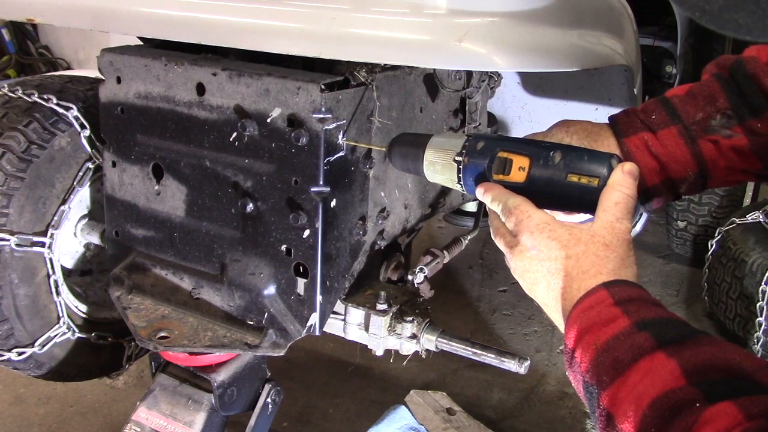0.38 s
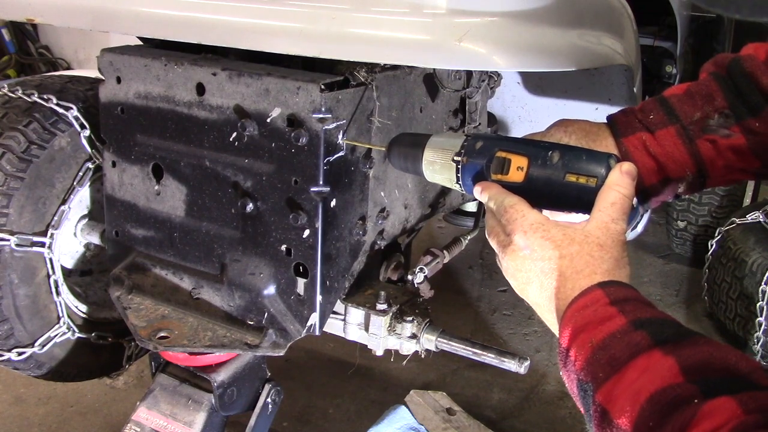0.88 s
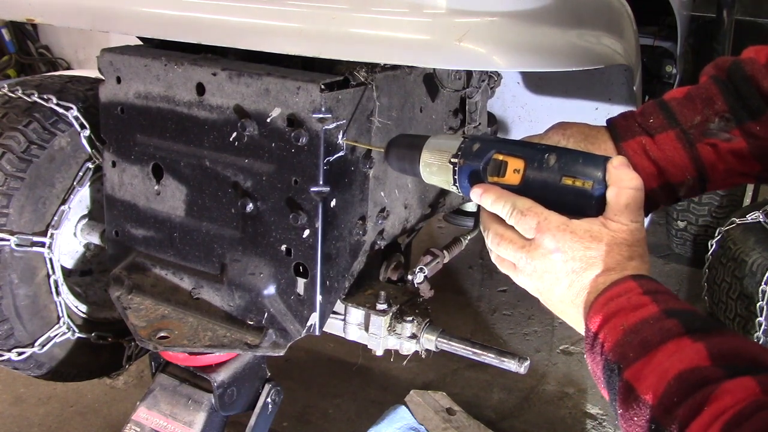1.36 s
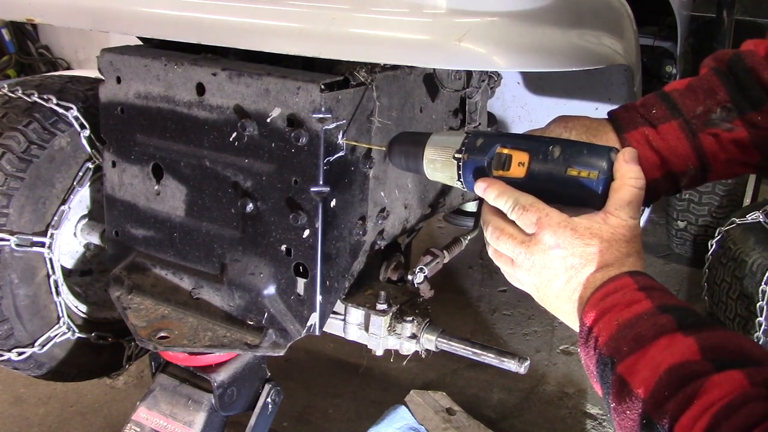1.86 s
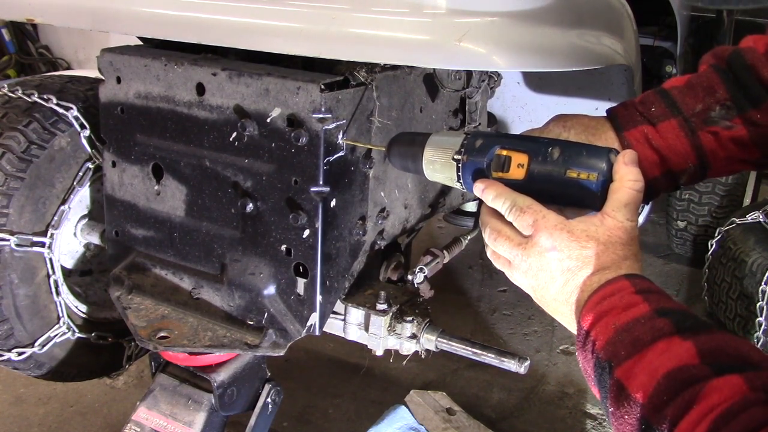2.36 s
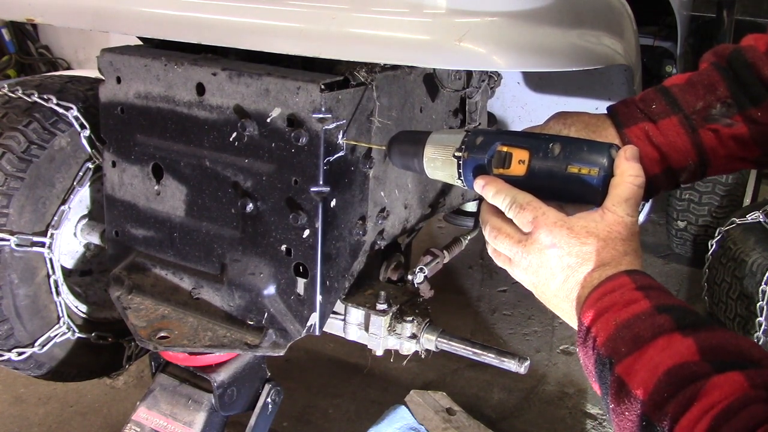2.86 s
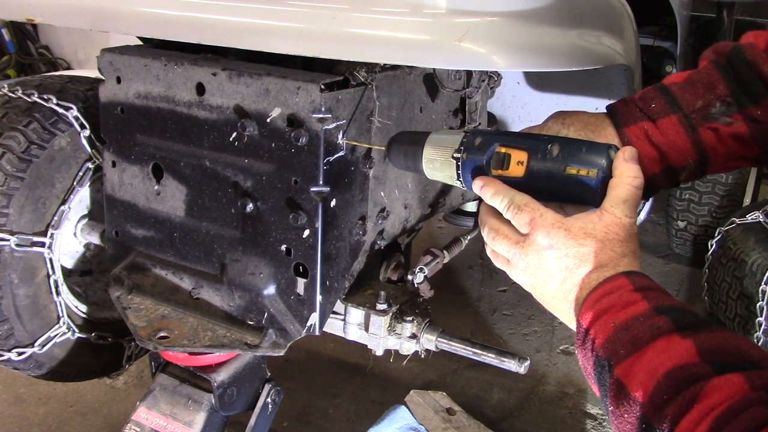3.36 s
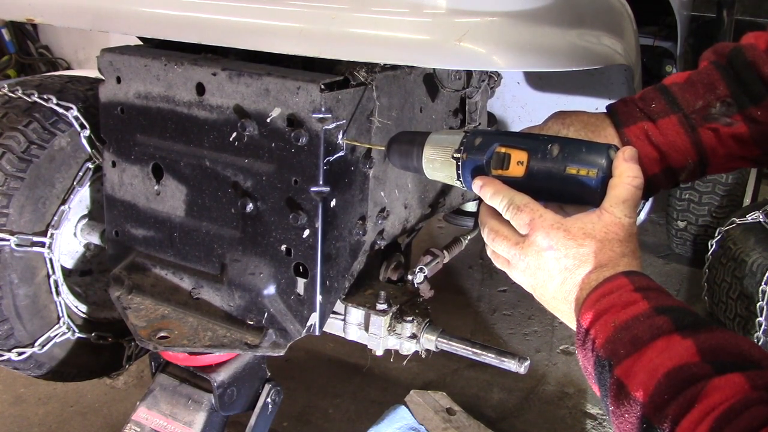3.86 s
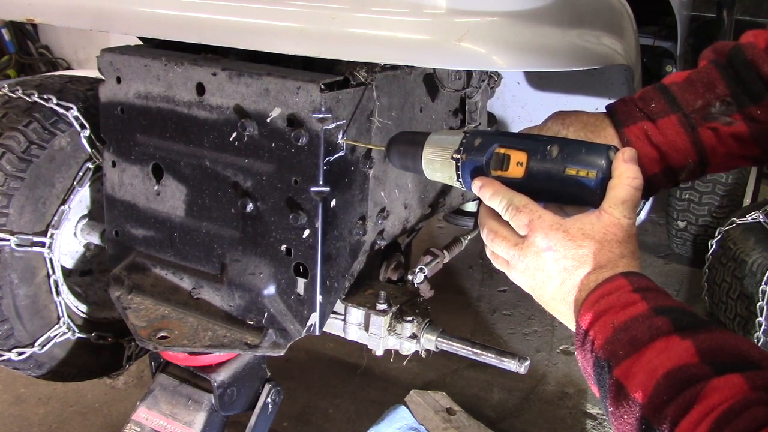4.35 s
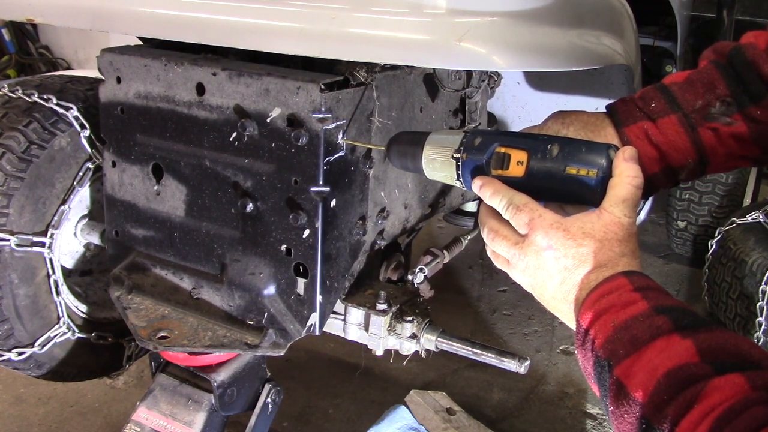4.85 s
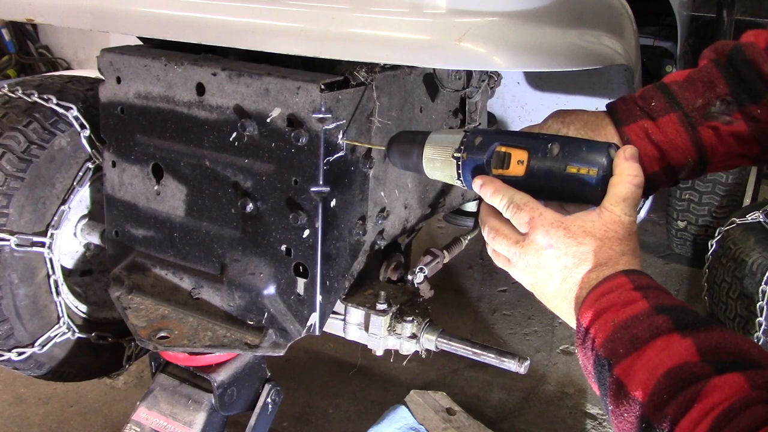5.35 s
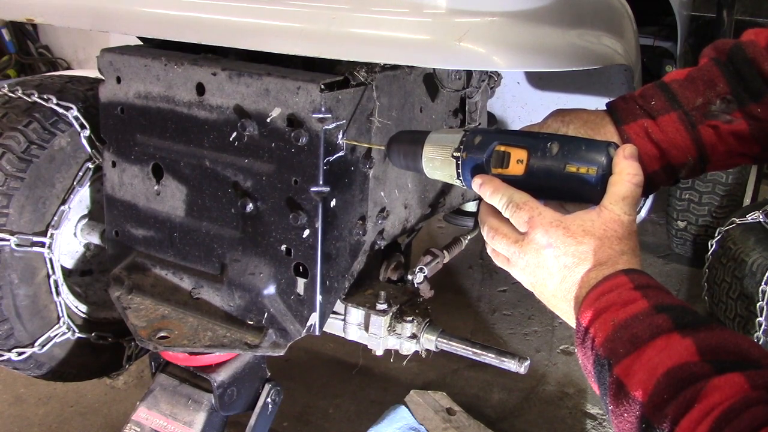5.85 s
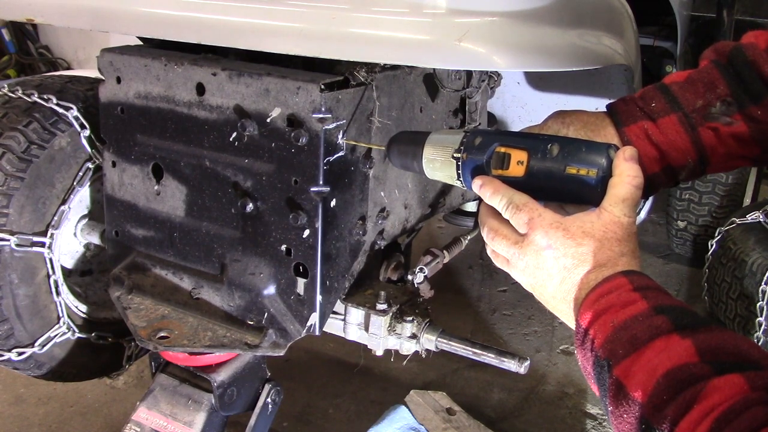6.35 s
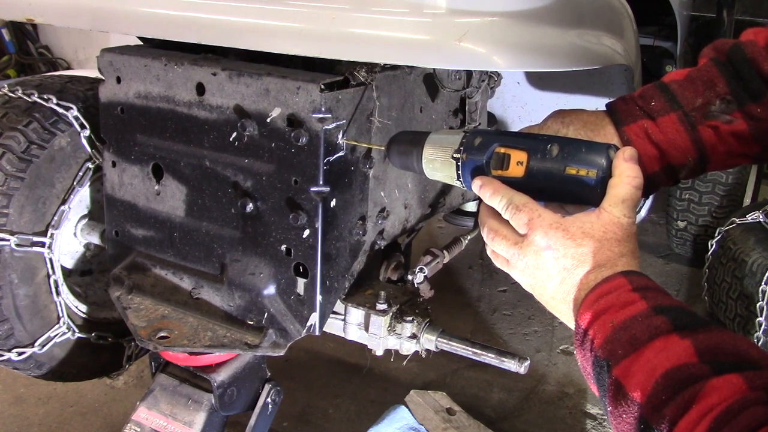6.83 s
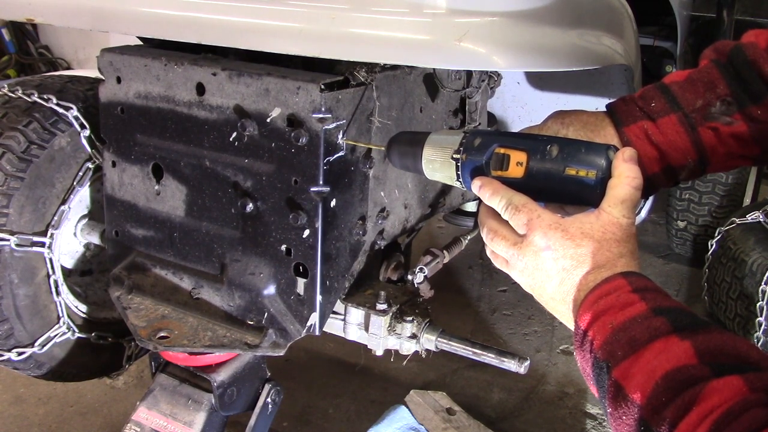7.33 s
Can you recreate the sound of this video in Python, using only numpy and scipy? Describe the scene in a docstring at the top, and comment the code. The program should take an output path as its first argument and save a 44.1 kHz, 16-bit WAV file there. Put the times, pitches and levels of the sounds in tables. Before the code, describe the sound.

A cordless drill is already running under load, close to the microphone in a garage. Its motor drones with a coarse plastic-housed gear buzz and bright hissing rattle, fluttering about fifteen times a second, while the bit scratches steadily at steel. At about 0.7 s the pressure lets up: the motor quickly races, a piercing whine around 4 kHz emerges, and the cutting falls away. From 1.3 s it sags back over roughly half a second to its steady, lower grind. A faint hum passes near 1.1 s. The cutting stays modest until about 3.3 s, then becomes louder, with crisp ringing and dry ticks around 4 to 5 kHz. Short squeaky chirps strike around 4.0 to 4.4 s, return from 6.0 s, and crowd together between 7.0 and 7.4 s. Soft low rumble swells underneath roughly every 1.2 s. The drill is still running at the end, about 7.5 s.

```python
"""A cordless drill bores a steel frame in a garage, close to a pair of microphone ports.
For about 0.6 s the pressure lets up: the motor races and whines, then sags back under load.
Motor and gears are tones and noise bands locked to shaft speed, coloured by the housing; rattle is noise.
Cutting is clicks that ring the frame, swelling once a chuck turn and louder later in the hole.
Hard catches chirp; a low rumble lies beneath, with one brief hum."""
import sys
import numpy as np
from scipy import signal
from scipy.fft import rfft, irfft
from scipy.io import wavfile
from scipy.ndimage import uniform_filter1d

SR = 44100
rng = np.random.default_rng(int(sys.argv[2]) if len(sys.argv) > 2 else 0)


def field_ratio(decibels):
    """Amplitude ratio for a level in dB (20 dB per decade); scalars and array-likes work."""
    return 10 ** (np.asarray(decibels, dtype=float) / 20)


def unload_wav(signal):
    """Save mono or channel-first audio to the path in sys.argv[1] as 16-bit WAV at rate SR, clipped to [-1, 1]."""
    wavfile.write(
        sys.argv[1],
        SR,
        np.round(np.clip(np.atleast_2d(signal).T, -1, 1) * 32767).astype(np.int16),
    )


N = 328986
T = np.arange(N) / SR
HZ = np.fft.rfftfreq(N, 1 / SR)

GEAR_RATIO = 15.85  # shaft turns per chuck turn
FREE_HZ, LOADED_HZ = 337.1, 237  # shaft turns per s
LET_UP_S, SPIN_UP_S, PRESS_S, SAG_S = .705, .072, 1.303, .289
WHINE_SETS_IN_S, WHINE_MUTED_DB = .75, -16
# off-centre gear, once a chuck turn
GEAR_HUM_MESHES_PER_TURN, HURRY_RAD, HURRY_AT_TURN, PRESS_DB = 42.9, .8, .74, 4.5
UNLOADED_BITE_DB = -15.5
SWELL_RISE_S, RUMBLE_FLOOR_DB = .046, -53.5
HUM_START_S, HUM_END_S, HUM_DB = 1.04, 1.225, -45
HUM_HZ, HUM_DROP_HZ, HUM_SETTLE_S = 158, 40.3, .025
SECOND_LIP_S, SECOND_LIP_DB = .034, -5.5

# Motor shaft speed while the bit is pressed in: [start_s, turns_per_s]
PRESSED_SPEED = [(0, 218.7), (.35, 232.6), (.7, 237.6), (2, 242.1), (3.5, 241.5), (4.4, 235.06),
                 (5.8, 234.8), (6.5, 232.4), (7, 234.5), (7.46, 232.7)]
# Armature whine against shaft speed, ahead of the housing: [turns_per_s, level_db]
ARMATURE_WHINE = [(246, -42), (253, -44), (259, -32.5), (296, -34.5), (306, -22.5), (322, -21), (337, -19)]
# Shaft orders, ahead of the housing: [shaft_multiple, free_db, loaded_db]
SHAFT_ORDERS = [(1, -50.5, -53.5), (2, -60.5, -58.5), (3, -53, -54.5), (4, -48, -59), (5, -58.5, -51.5),
                (8, -41, -62.5), (9, -45, -58.5), (10, -36.5, -59), (11, -46.5, -60), (15, -51, -59),
                (24, -59, -43)]
# Gear tones, ahead of throb and housing: [chuck_multiple, free_db, loaded_db]
CHUCK_TONES = [(30.8, -62, -58), (83.8, -58, -60), (85.8, -48, -49.5), (87.8, -55, -53), (89.8, -58, -59)]
# Rough gear meshes, ahead of throb and housing: [shaft_multiple, width_hz, free_db, loaded_db]
GEAR_MESHES = [(2.72, 58, -52, -53.5), (5.47, 120, -47.5, -50), (8.15, 40, -43, -56),
               (10.87, 75, -34.5, -41.5), (13.58, 53, -45.5, -38.5)]
# Plastic shell resonances: [centre_hz, width_hz, gain_db]
SHELL_MODES = [(286.6, 7.8, 8.5), (373, 18, 6), (464, 13.6, 9), (503, 21, 6.5), (567, 44, 9),
               (652, 48, 8.5), (710, 47, 3.5), (792, 79, 6), (1005, 11, 6.5), (1185, 16, 6),
               (1325, 103, 10.5), (1480, 125, 9.5), (1777, 39, 2.5), (1830, 11, 4), (3110, 160, 1.5),
               (3940, 110, 1.5), (6450, 560, 5)]
# Bit runout over time: [start_s, throb_factor]
BIT_RUNOUT = [(0, .8), (1.5, 1.0), (2, 1.45), (3.7, 1.35), (4.2, .75), (7.46, .85)]
# Relative rattle spectrum, ahead of the housing: [centre_hz, density_db_per_hz]
RATTLE_SPECTRUM = [(60, -31.5), (180, -24.5), (400, -21), (900, -17), (1100, -17.5), (1700, -11),
                   (2150, -18), (3000, -10), (4500, -1), (6500, -11), (8000, -11.5), (10000, -20.5),
                   (12500, -32.5), (16000, -43.5)]
# Gear and fan rattle over time: [start_s, level_db]
RATTLE_LEVELS = [(0, -21.5), (.65, -20.5), (.78, -17.5), (1.0, -20), (1.4, -23), (2, -21.5), (2.8, -21),
                 (5, -20), (7.46, -20.5)]
# Steel frame modes, relative energy: [pitch_hz, level_db, t60_s]
STEEL_MODES = [(2318, -9, .12), (2472, -7, .08), (2894, -7, .11), (3070, -13, .05), (3420, -13, .08),
               (3650, -12, .06), (3846, -9, .05), (4340, -4, .03), (4438, 0, .1), (4545, 1, .04),
               (4625, -2, .05), (4863, -2, .11), (4945, -6, .06), (5060, -6, .03), (5150, -6, .04),
               (5275, -11, .06), (5419, -1, .11), (5525, -3, .1), (5630, -8, .07)]
# Cutting level at full load: [start_s, level_db]
LOADED_BITE = [(0, -29.5), (.5, -30.5), (2, -33), (3.3, -28), (3.4, -24.5), (3.9, -27.5), (4.05, -23),
               (5.2, -23), (7.46, -21.5)]
# Low rumble swells: [peak_s, level_db, decay_s]
RUMBLE_SWELLS = [(-.03, -40, .12), (.91, -40, .22), (2.16, -41.5, .17), (3.45, -43.5, .1),
                 (4.64, -43.5, 0.09), (5.9, -43, .11), (7.2, -43, .1)]
# Hard catches of the bit: [start_s, peak_db, blow_hz]
BIT_CATCHES = [(4.0183, -30.5, 2360), (4.2877, -18.5, 2580), (4.3924, -26.5, 2520), (6.0392, -23.5, 2306),
               (6.195, -22.5, 2820), (6.5111, -20, 2330), (6.6702, -23, 2870), (6.989, -20.5, 2274),
               (7.0572, -19.5, 2384), (7.1237, -21.5, 2310), (7.1943, -22, 2405), (7.3667, -19.5, 2420)]
# Phase lead of the left port, used up to 10 kHz: [centre_hz, lead_rad]
PORT_LEAD = [(400, 0.06), (1200, -0.12), (2100, -.16), (3450, -0.72), (4220, -1.0), (6000, -1.5),
             (8440, -2.5), (10000, -2.5)]
# Phase scatter from garage echoes, used up to 10 kHz: [centre_hz, scatter_rad]
ECHO_SCATTER = [(30, .3), (90, 0.93), (200, 0.35), (700, 0.09), (1300, .1), (2000, 0.13), (4000, 0.38),
                (9000, 0.43)]


def curve(rows):
    """Interpolates a table over time."""
    return np.interp(T, *np.transpose(rows))


def read(points):
    """Interpolates a spectrum on a log-frequency axis."""
    hz, value = np.transpose(points)
    return np.interp(np.log(HZ + 1), np.log(hz + 1), value)


def evened(x):
    """Scales to rms 1."""
    return x / np.sqrt(np.mean(x ** 2) + 1e-20)


def shaped(x, gain):
    """Filters by a gain per frequency."""
    return irfft(rfft(x) * gain, N)


def slow(hz):
    """Random drift up to about hz, rms 1."""
    return evened(shaped(rng.standard_normal(N), 1 / (1 + (HZ / hz) ** 4)))


def resonate(x, hz, width_hz):
    """Moving band: shifts hz down to zero, smooths twice, shifts back."""
    carrier = np.exp(2j * np.pi * np.cumsum(hz) / SR)
    pole = np.exp(-np.pi * width_hz / SR)
    smooth = signal.lfilter([(1 - pole) ** 2], [1, -2 * pole, pole * pole], x / carrier)
    return 2 * (carrier * smooth).real


def shaft():
    """Speed climbs toward free running as pressure lets up, sags back as it returns."""
    pressed_hz = curve(PRESSED_SPEED)
    rise = 1 - np.exp(-np.maximum(T - LET_UP_S, 0) / SPIN_UP_S)
    sag = np.exp(-np.maximum(T - PRESS_S, 0) / SAG_S)
    return pressed_hz + rise * sag * (FREE_HZ - pressed_hz)


def throb(turns, depth_db, at_turn, lips_db, planets_db=0):
    """Gain per chuck turn: one swell from runout, two from the lips, three from the planet gears."""
    angle = 2 * np.pi * (turns / GEAR_RATIO - at_turn)
    bit_db = depth_db * np.cos(angle) + lips_db * np.cos(2 * angle)
    return field_ratio(curve(BIT_RUNOUT) * bit_db + planets_db * np.cos(3 * angle))


def housing():
    """Gain of the plastic shell: resonant peaks add power to a flat response."""
    power = 1
    for hz, width_hz, db in SHELL_MODES:
        power = power + (field_ratio(db) ** 2 - 1) / (1 + (2 * (HZ - hz) / width_hz) ** 2)
    return np.sqrt(abs(power))


def tone(cycles, pressed, free_db, loaded_db):
    """Tone wavering in level and phase; pressed (0 to 1) blends free and loaded levels."""
    level_db = free_db + pressed * (loaded_db - free_db) + 1.5 * slow(15)
    wander_cycles = rng.random() + .068 * slow(6.7)
    return np.sqrt(2) * field_ratio(level_db) * np.cos(2 * np.pi * (cycles + wander_cycles))


def whine(speed, turns, load, pressed):
    """Twelve-part armature sings at 12 cycles a turn, held down until the motor has come free."""
    muted = pressed * (1 - load) * (T < PRESS_S - SAG_S)
    level_db = np.interp(speed, *np.transpose(ARMATURE_WHINE)) + WHINE_MUTED_DB * muted
    return np.sqrt(2) * field_ratio(level_db + slow(37)) * np.cos(2 * np.pi * 12 * turns)


def gear_hum(turns, load):
    """An off-centre gear hurries and presses harder once a chuck turn."""
    chuck_turns = turns / GEAR_RATIO
    angle = 2 * np.pi * (chuck_turns - HURRY_AT_TURN)
    cycles = GEAR_HUM_MESHES_PER_TURN * chuck_turns + HURRY_RAD * np.sin(angle) / (2 * np.pi)
    return field_ratio(PRESS_DB * np.cos(angle)) * tone(cycles, load, -56, -52)


def gears(speed, turns, load, pressed):
    """Chuck-locked tones and speed-tracking mesh noise, throbbing under load."""
    out = sum(tone(k * turns / GEAR_RATIO, pressed, *levels) for k, *levels in CHUCK_TONES)
    for k, width_hz, free_db, loaded_db in GEAR_MESHES:
        mesh = evened(resonate(rng.standard_normal(N), k * speed, width_hz))
        out += field_ratio(free_db + load * (loaded_db - free_db)) * mesh
    return out * throb(turns, 2.8 * load, at_turn=.53, lips_db=1.5 * load, planets_db=.8 * load)


def motor(speed, turns, load):
    """Whine, shaft orders and gears, all through the housing."""
    pressed = uniform_filter1d(1. * ((T < WHINE_SETS_IN_S) | (T > PRESS_S)), size=1500)
    out = whine(speed, turns, load, pressed)
    out += sum(tone(k * turns, pressed, *levels) for k, *levels in SHAFT_ORDERS)
    out += gear_hum(turns, load) + gears(speed, turns, load, pressed)
    return shaped(out, housing())


def rattle(turns, load):
    """Dense gear and fan noise coloured by the housing."""
    noise = rng.standard_normal(N) * throb(turns, load, at_turn=.48, lips_db=.3 * load)
    return field_ratio(curve(RATTLE_LEVELS)) * evened(shaped(noise, field_ratio(read(RATTLE_SPECTRUM)) * housing()))


def bite_db(load):
    """Cutting level; falls away as the bit unloads."""
    return curve(LOADED_BITE) + UNLOADED_BITE_DB * (1 - load)


def steel_modes():
    """Decaying sines of the struck frame, each scaled by its decay time."""
    t = T[:SR // 2]
    return [field_ratio(db - 60 * t / t60_s) * np.sin(2 * np.pi * hz * t) / np.sqrt(t60_s)
            for hz, db, t60_s in STEEL_MODES]


def chips(turns, load):
    """Chips tear off in uneven clicks, about 3000 a second, and ring the steel."""
    struck = rng.random(N) < 3000 / SR
    size = field_ratio(5.1 * np.minimum(rng.exponential(1, N), 3))
    clicks = size * rng.standard_normal(N) * struck
    pulse = throb(turns, 2.1, at_turn=.64, lips_db=1.4, planets_db=2.8)
    out = 0
    for mode in steel_modes():
        # each mode has its own click order and drift
        drive = rng.permutation(clicks) * pulse * field_ratio(1.9 * slow(14))
        out = out + signal.oaconvolve(drive, mode)[:N]
    return evened(out) * field_ratio(bite_db(load))


def snaps(turns, load):
    """Long chips break at random with dry 4.6 kHz ticks, mostly on the hard side of the turn."""
    odds = 45 / SR * throb(turns, 6.0, at_turn=.62, lips_db=2.0, planets_db=4.0)
    size = (rng.random(N) < odds) * field_ratio(3.2 * rng.standard_normal(N))
    tick = np.exp(-T[:400] / .00094) * np.sin(2 * np.pi * 4600 * T[:400])
    return field_ratio(bite_db(load) + 10) * signal.oaconvolve(size, tick)[:N]


def rumble():
    """Lumpy low noise with a wandering floor and nearly regular swells."""
    lumps = evened(shaped(rng.standard_normal(N), HZ / (HZ + 8) / (1 + (HZ / 32) ** 2.3)))
    level = field_ratio(RUMBLE_FLOOR_DB + 3.4 * slow(4))
    for peak_s, db, decay_s in RUMBLE_SWELLS:
        exponent = np.where(T < peak_s, (T - peak_s) / SWELL_RISE_S, (peak_s - T) / decay_s)
        level += field_ratio(db) * np.exp(exponent)
    return level * lumps


def low_hum():
    """Brief soft sine that starts high and settles."""
    hz = HUM_HZ + HUM_DROP_HZ * np.exp(-np.maximum(T - HUM_START_S, 0) / HUM_SETTLE_S)
    sounding = uniform_filter1d(1. * (T > HUM_START_S) * (T < HUM_END_S), size=1800)
    return np.sqrt(2) * field_ratio(HUM_DB) * sounding * np.sin(2 * np.pi * np.cumsum(hz) / SR)


def catches():
    """The bit catches: a short blow chirps the frame, then the other lip half a chuck turn later."""
    out = np.zeros(N)
    ring = sum(steel_modes())
    gap = np.zeros(round(SECOND_LIP_S * SR) - 450)
    for start_s, db, hz in BIT_CATCHES:
        start = round(start_s * SR)
        blow = signal.windows.hann(450) * np.sin(2 * np.pi * hz * T[:450])
        blows = np.concatenate([blow, gap, field_ratio(SECOND_LIP_DB) * blow])
        chirp = signal.fftconvolve(blows, ring)[:N - start]
        out[start:start + len(chirp)] += field_ratio(db) * chirp / abs(chirp).max()
    return out


def ports(near):
    """Up to 10 kHz the ports differ by a phase lead that echoes scatter over frequency."""
    scatter = evened(uniform_filter1d(rng.standard_normal(len(HZ)), size=40))
    lead_rad = read(PORT_LEAD) + read(ECHO_SCATTER) * scatter
    # above 10 kHz the two channels are opposite in sign
    half = np.exp(.5j * np.where(HZ > 10000, -np.pi, lead_rad))
    return np.array([shaped(near, half), shaped(near, 1 / half)])


def scene():
    """Shaft speed sets the load; drill, cutting and low sounds sum at the ports."""
    speed = shaft()
    turns = np.cumsum(speed) / SR
    load = np.clip((FREE_HZ - speed) / (FREE_HZ - LOADED_HZ), 0, 1)
    near = motor(speed, turns, load) + rattle(turns, load)
    near += chips(turns, load) + snaps(turns, load)
    near += rumble() + low_hum() + catches()
    return ports(near)


def roll_off(x):
    """The treble ends steeply here."""
    return signal.sosfilt(signal.butter(12, 15800, fs=SR, output="sos"), x)


def record(dry):
    """The input stage rounds off the tallest peaks."""
    rounded = .75 * np.tanh(dry / .75)
    return roll_off(rounded)


dry = scene()
out = record(dry)
unload_wav(out)
```